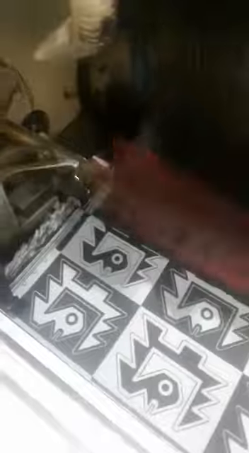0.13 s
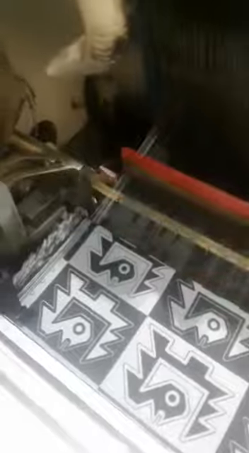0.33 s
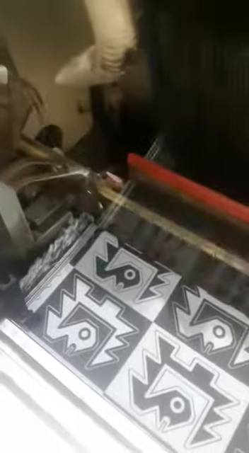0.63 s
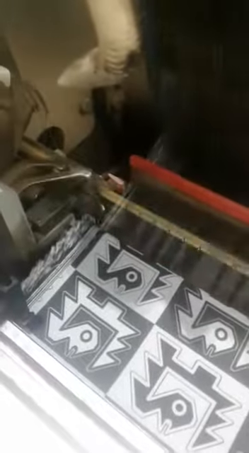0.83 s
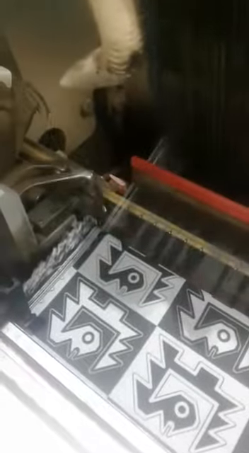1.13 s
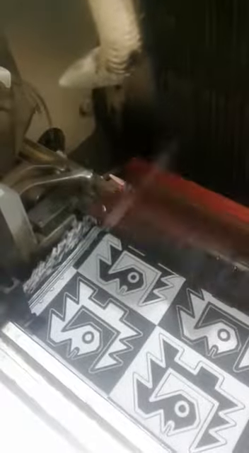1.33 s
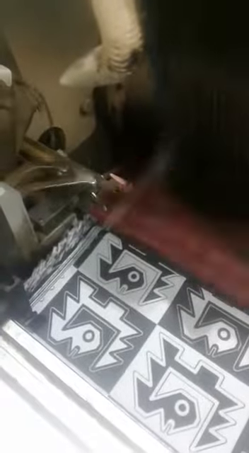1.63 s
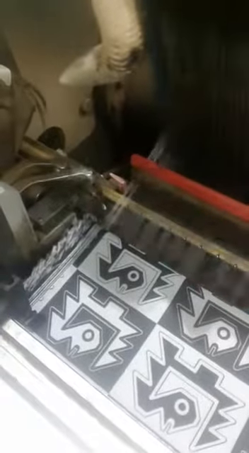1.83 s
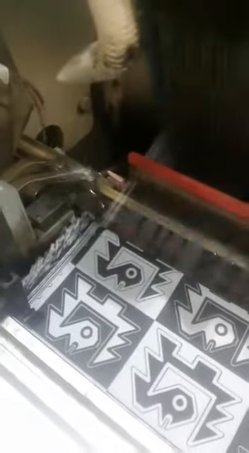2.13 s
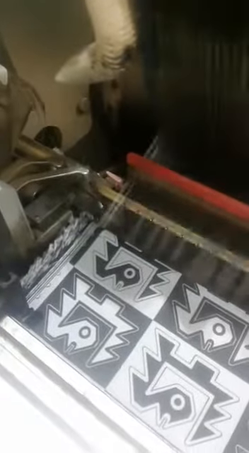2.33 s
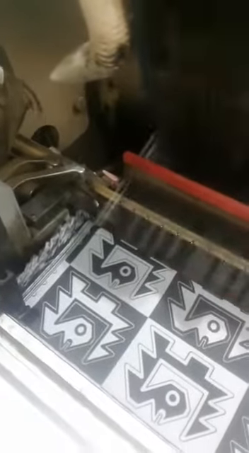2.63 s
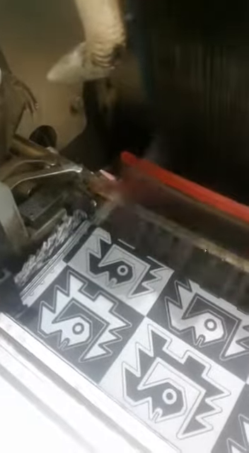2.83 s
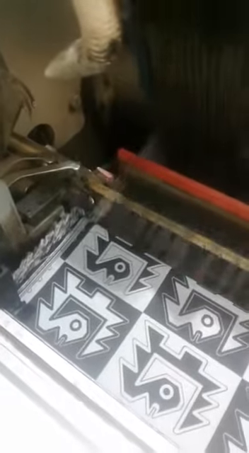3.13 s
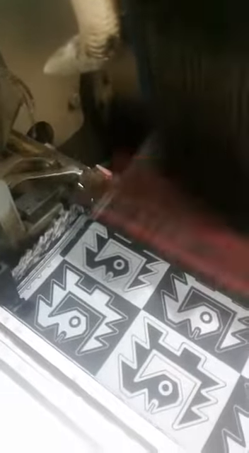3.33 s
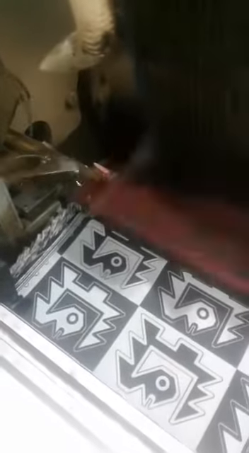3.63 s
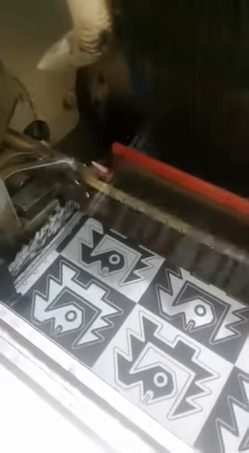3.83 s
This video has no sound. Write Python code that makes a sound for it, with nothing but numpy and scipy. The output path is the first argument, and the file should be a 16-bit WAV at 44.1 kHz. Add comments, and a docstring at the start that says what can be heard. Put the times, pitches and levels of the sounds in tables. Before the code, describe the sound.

Running weaving loom, about six and a half heavy clacking beats a second, with a faint motor whine.

```python
"""A workshop, with a power loom running close to a phone microphone; the sound fades in after a silent start.
Behind it lie the roar of gears and other looms, as patchy noise, and a faint motor whine of unsteady sines.
Close up, each pick the reed beats the weft home: a low thump of falling pitch and a ring of the frame.
Around each beat cams, grippers and harness clunk and rattle in a fixed order: short chattering tones and
flurries of noisy ticks, with a few loud snaps. The room answers these two briefly."""
import sys
import numpy as np
from scipy import signal
from scipy.fft import rfft, irfft, next_fast_len
from scipy.io import wavfile
from scipy.ndimage import uniform_filter1d, map_coordinates

SR = 44100
rng = np.random.default_rng(int(sys.argv[2]) if len(sys.argv) > 2 else 0)


def field_ratio(decibels):
    """Amplitude ratio for a level in dB (20 dB per decade); scalars and array-likes work."""
    return 10 ** (np.asarray(decibels, dtype=float) / 20)


def output_pcm(signal):
    """Save a mono or channel-first signal as 16-bit PCM at the path in sys.argv[1].

    Samples are clipped to [-1, 1] before scaling.
    """
    pcm = np.clip(np.atleast_2d(signal).T, -1, 1) * 32767
    wavfile.write(sys.argv[1], SR, np.round(pcm).astype(np.int16))


N = 176400  # four seconds

# Gears, belts and other looms farther off: colour of the roar. Each row: frequency in Hz, relative level in dB.
ROAR_COLOUR = [(25, -39), (45, -22), (65, -25), (120, -10.5), (190, -10), (260, -8), (330, -8.5), (420, -6),
               (640, -8.5), (880, -13), (1090, -9), (1360, -11.5), (2390, -21), (2970, -23.5), (4210, -29),
               (6660, -31), (8490, -25.5), (9800, -35), (11400, -53), (13500, -45), (15800, -45)]
# Tones of motor and gear mesh. Each row: frequency in Hz, mean rms level in dB, waver of the pitch in Hz.
WHINE_TONES = [(2993.5, -38.5, 2), (2871, -47, 1.5), (1100.4, -29.5, 2.5), (333, -29, 2.5), (243, -31, 2),
               (209.6, -31, 1.5), (7870, -46, 30), (13620, -60, 60)]
# Rattling of heddles and grippers. Each row: start in seconds after the beat, length in seconds,
# level before colouring in dB on even picks, the same on odd picks, brightness from 0 to 1.
RATTLE_FLURRIES = [(.001, .004, -51, -50, .1), (.029, 0.019, -23, -22, 0.1), (0.04, .014, -33, -36, 0.6),
                   (0.052, 0.022, -22, -22.5, 0.56), (0.056, 0.0058, -33, -36, 0.6),
                   (0.083, .022, -28, -32, .7), (0.094, .014, -31, -28, 0.7),
                   (.112, 0.017, -20.5, -25.5, 0.28), (0.119, 0.021, -21, -18.5, 0.17)]
# Loudest single snaps. Each row: start in seconds, level before colouring in dB, brightness from 0 to 1.
LOUD_SNAPS = [(1.125, -8, 0), (1.572, -8.5, 0.4), (1.7389, -10, 0.2), (1.7964, -12, 0.3),
              (2.1812, -2.5, 0.1), (2.4075, -15, 0.3), (2.4394, -18, 0.5), (2.745, -17, 0.4),
              (2.795, -5, 0.1), (3.051, -17, 0.5), (3.402, -5.5, 0.2), (3.5098, -22, 0.5),
              (3.6618, -8, 0.5), (3.781, -12, 0.1)]
# The two colours of rattles and snaps. Each row: frequency in Hz, relative level in dB.
DULL_COLOUR = [(1500, -30), (3000, -14), (5000, -10.5), (7000, -15), (8500, -2), (10000, -16), (12000, -48),
               (15500, -22)]
BRIGHT_COLOUR = [(2500, -57), (5000, -8), (8500, -5), (10500, -12), (11800, -12.5), (13300, -8.5),
                 (15500, -10)]
# Clunks of cams and levers. Each row: start in seconds after the beat, pitch in Hz, length in seconds,
# level in dB on even picks, level in dB on odd picks.
KNOCKED_PARTS = [(-.008, 1550, 0.011, -18, -17), (0.0194, 1365, .018, -21, -18),
                 (.008, 940, 0.018, -24.5, -25), (.062, 1105, 0.022, -22.5, -19.5),
                 (.11, 1095, 0.032, -20.5, -18), (.05, 625, 0.028, -19.5, -19),
                 (.056, 336, 0.04, -14.5, -17.5), (.084, 333, 0.026, -17, -14), (.03, 250, .026, -19, -18),
                 (.09, 2730, .012, -26, -29), (.08, 1900, 0.013, -26.5, -24),
                 (0.0643, 455, 0.029, -19, -19.5), (0.13, 510, 0.015, -23, -20.5),
                 (-.004, 1400, 0.016, -14.5, -20), (.005, 1450, .024, -24, -26.5),
                 (0.034, 3580, 0.02, -38, -32)]
# Strength of the reed's blow over a four-pick weave. Each entry: level in dB.
WEAVE_BEAT_DB = [0.5, -1.5, -2.5, -1]
# The frame's ring. Each row: frequency in Hz, level in dB, time to fall by 60 dB in seconds.
FRAME_MODES = [(238.4, -7, 0.075), (209.7, -25, 0.32), (269, -8, 0.071), (445, -24, 0.11), (133, -19, 0.14),
               (77, -28.5, 0.31)]

FIRST_BEAT_S, PICK_S, PICKS = 0.394, 0.15268, 24


def unit(x):
    """Scales x to an rms of one."""
    return x / np.sqrt(np.mean(x ** 2) + 1e-20)


def along(points, hz):
    """Gain along (Hz, dB) points on a log frequency axis, shut off beyond both ends."""
    point_hz, point_db = np.transpose(points)
    return field_ratio(np.interp(np.log(hz + 1), np.log(point_hz + 1), point_db, left=-120, right=-120))


def filtered(x, response):
    """Multiplies the spectrum of x by a response of frequency."""
    size = next_fast_len(N + SR // 2)
    return irfft(rfft(x, size) * response(np.fft.rfftfreq(size, 1 / SR)), size)[..., :N]


def wobble(rate):
    """A smooth random curve, rate knots a second."""
    knots = rng.standard_normal(int(N * rate / SR) + 4)
    return map_coordinates(knots, [np.arange(N) * rate / SR])


def beats():
    """Times of the reed's blows in seconds, from two picks ahead of FIRST_BEAT_S."""
    return FIRST_BEAT_S + PICK_S * np.arange(-2, PICKS + 1)


def bursts(after_s, length_s, even_db, odd_db, scatter_db):
    """An envelope with one quick rise and slower fall in every pick, each a little early or late."""
    jitter_s = 0.0015
    env = np.zeros(N + SR)
    u = np.linspace(0, 10, max(int(2.5 * length_s * SR), 8))
    shape = (u / 2 * np.exp(1 - u / 2)) ** 2  # peaks at one, half of length_s in
    for k, beat_s in enumerate(beats()):
        db = (even_db, odd_db)[k % 2] + scatter_db * rng.standard_normal()
        start = round((beat_s + after_s + jitter_s * rng.standard_normal()) * SR)
        env[start:][:len(u)] += field_ratio(db) * shape
    return env[:N]


def roar(patchy_db):
    """Gears, belts and farther looms blur into noise, its level patchy in time and frequency."""
    level_db = -15.5  # rms
    z = signal.stft(rng.standard_normal(N), nperseg=256)[2]
    patches = uniform_filter1d(rng.standard_normal(z.shape), 5, 0)
    patches = uniform_filter1d(patches, 7, 1)
    noise = signal.istft(z * field_ratio(patchy_db * unit(patches)), nperseg=256)[1][:N]
    return field_ratio(level_db) * unit(filtered(noise, lambda f: along(ROAR_COLOUR, f)))


def whine():
    """Tones of motor and gear mesh, slightly unsteady in level and pitch."""
    flutter_db = 2.5
    out = np.zeros(N)
    for hz, db, waver_hz in WHINE_TONES:
        level = np.sqrt(2) * field_ratio(db + flutter_db * wobble(9))
        turns = np.cumsum(hz + waver_hz * wobble(25)) / SR
        out += level * np.sin(2 * np.pi * turns)
    return out


def room(x):
    """The workshop's short answer: decaying noise of unit energy, about 11 ms late."""
    t60_s = 0.083
    t = np.arange(SR // 3) / SR
    tail = rng.standard_normal(len(t)) * field_ratio(-60 * t / t60_s)
    return signal.fftconvolve(np.pad(x, (500, 0)), tail / np.linalg.norm(tail))[:N]


def rattles():
    """Dense steel ticks of uneven size in flurries, and a few loud snaps; brightness mixes two colours."""
    ticks_per_s, tick_spread_db, scatter_db = 3000, 2.8, 1.7
    snap_t60_s, snap_rise_s = 0.028, 0.0017
    dull, bright = np.zeros((2, N))
    for after_s, length_s, even_db, odd_db, brightness in RATTLE_FLURRIES:
        ticks = (rng.random(N) < ticks_per_s / SR) * field_ratio(tick_spread_db * rng.standard_normal(N))
        decays = np.convolve(ticks, np.exp(-np.arange(100) / 25), "same")
        flurry = unit(decays * rng.standard_normal(N))
        flurry = flurry * bursts(after_s, length_s, even_db, odd_db, scatter_db)
        dull += (1 - brightness) * flurry
        bright += brightness * flurry
    t = np.arange(SR // 50) / SR
    for start_s, db, brightness in LOUD_SNAPS:
        envelope = field_ratio(db - 60 * t / snap_t60_s) * (1 - np.exp(-t / snap_rise_s))
        snap = envelope * rng.standard_normal(len(t))
        start = round(start_s * SR)
        dull[start:][:len(t)] += (1 - brightness) * snap
        bright[start:][:len(t)] += brightness * snap
    dull = filtered(dull, lambda f: along(DULL_COLOUR, f))
    bright = filtered(bright, lambda f: along(BRIGHT_COLOUR, f))
    return 2 * dull + 2 * bright


def clunks():
    """Each part is knocked, swells and rings out at its own pitch, a little early or late and out of tune."""
    detune, scatter_db, jitter_s = 0.008, 1.4, 0.0003  # detune as a share of the pitch
    flutters_a_cycle, full_depth, full_depth_hz = 0.25, 0.65, 2400
    out = np.zeros(N + SR)
    for after_s, hz, length_s, even_db, odd_db in KNOCKED_PARTS:
        t = np.arange(int(2.5 * length_s * SR) + 8) / SR
        swell = 3 * t / length_s * np.exp(1 - 3 * t / length_s)  # peaks a third of length_s in
        depth = full_depth * min(hz / full_depth_hz, 1)  # small high parts flutter most
        for k, beat_s in enumerate(beats()):
            size, tune, late = rng.standard_normal(3)
            chatter = np.interp(t * flutters_a_cycle * hz, np.arange(40), rng.standard_normal(40))
            tone = (1 + depth * chatter) * np.sin(2 * np.pi * hz * (1 + detune * tune) * t)
            level = field_ratio((even_db, odd_db)[k % 2] + scatter_db * size)
            start = round((beat_s + after_s + jitter_s * late) * SR)
            out[start:][:len(t)] += level * swell * tone
    return out[:N]


def reed():
    """The reed's soft blow thumps the taut cloth, whose pitch falls as it slackens, and rings the frame."""
    start_hz, end_hz, slacken_s, thump_peak_s = 409, 224, 0.0043, 0.0036
    blow_s, beat_scatter_db, ring_scatter_db = 0.003, 0.8, 2
    out, t = np.zeros(N + SR), np.arange(SR // 4) / SR
    turns = end_hz * t + (start_hz - end_hz) * slacken_s * (1 - np.exp(-t / slacken_s))
    thump = t / thump_peak_s * np.exp(1 - t / thump_peak_s) * np.sin(2 * np.pi * turns)
    soft_onset = 1 - np.exp(-(t / blow_s) ** 2)
    for k, beat_s in enumerate(beats()):
        ring = np.zeros(len(t))
        for hz, db, t60_s in FRAME_MODES:
            decay = field_ratio(db + ring_scatter_db * rng.standard_normal() - 60 * t / t60_s)
            ring += decay * np.sin(2 * np.pi * hz * t)
        gain = field_ratio(WEAVE_BEAT_DB[(k - 2) % 4] + beat_scatter_db * rng.standard_normal())
        out[round(beat_s * SR):][:len(t)] -= gain * (thump + ring * soft_onset)
    return out[:N]


def scene():
    """The loom close to the microphone, over the roar and whine, with the room behind clunks and rattles."""
    room_db = -8
    near = clunks() + rattles()
    mix = near + field_ratio(room_db) * room(near) + reed() + roar(patchy_db=0.5) + whine()
    return mix[None]  # one channel


def low_pass(x):
    """Removes everything above the highest recorded frequency."""
    return signal.sosfilt(signal.butter(12, 15990, fs=SR, output="sos"), x)


def record(dry):
    """The microphone overloads softly and limits the band; then a straight fade-in from silence."""
    ceiling, low_cut_hz, top_hz = 0.93, 40, 15740
    fade_start_s, fade_s = 0.367, 0.31
    x = dry / (1 + np.abs(dry / ceiling) ** 5) ** (1 / 5)
    x = filtered(x, lambda f: (f < top_hz) * (1j * f / (low_cut_hz + 1j * f)) ** 2)
    mix = x * np.clip((np.arange(N) / SR - fade_start_s) / fade_s, 0, 1)
    return low_pass(mix)


dry = scene()
out = record(dry)
output_pcm(out)
```